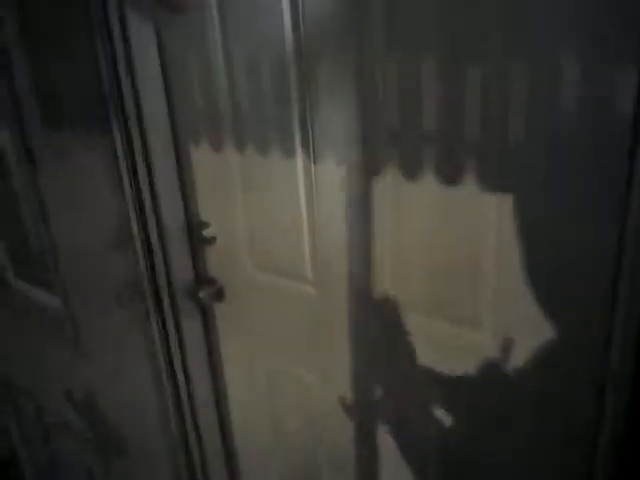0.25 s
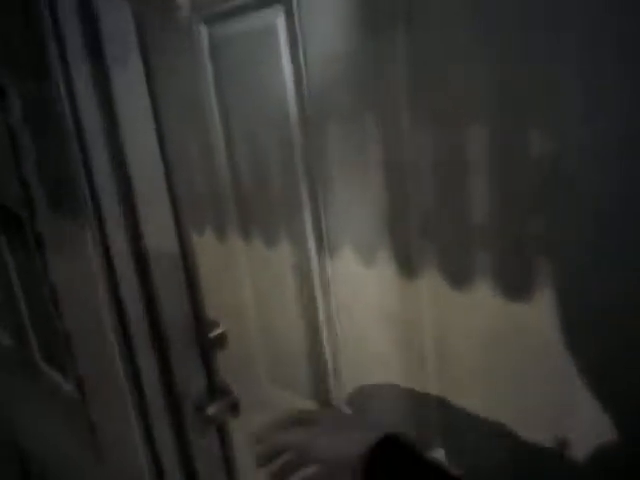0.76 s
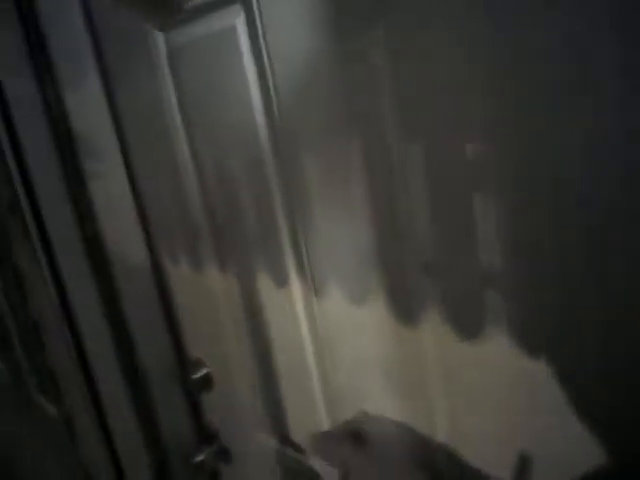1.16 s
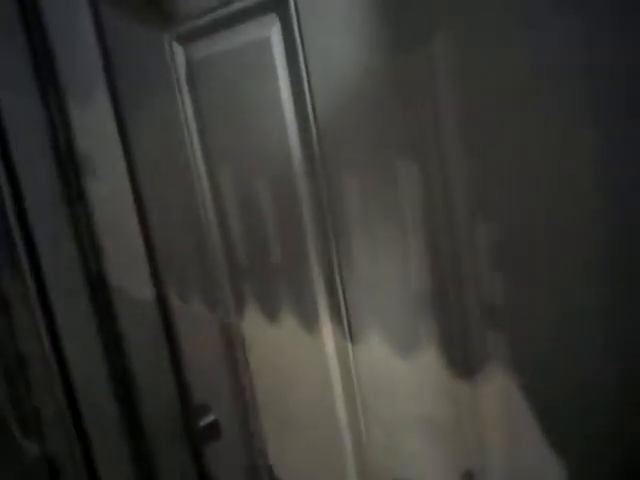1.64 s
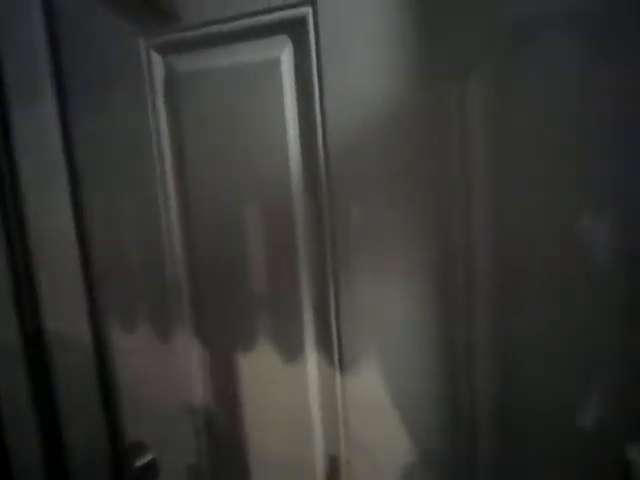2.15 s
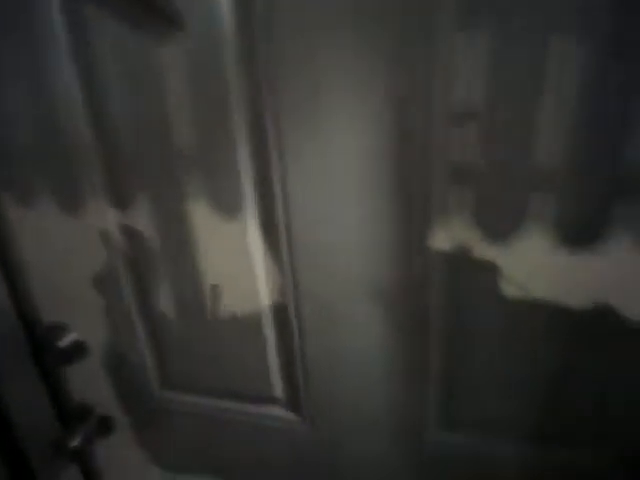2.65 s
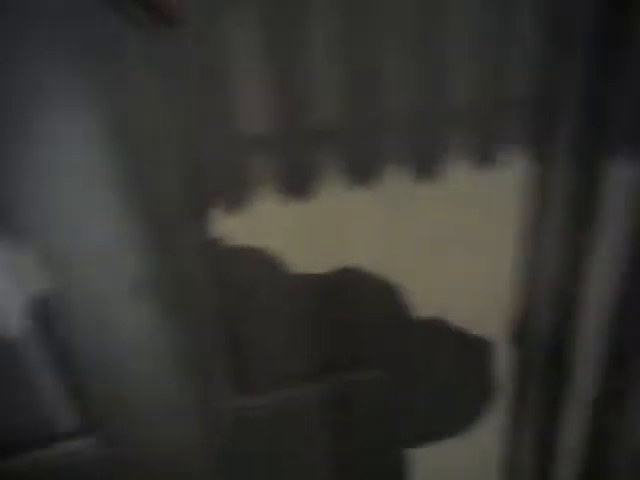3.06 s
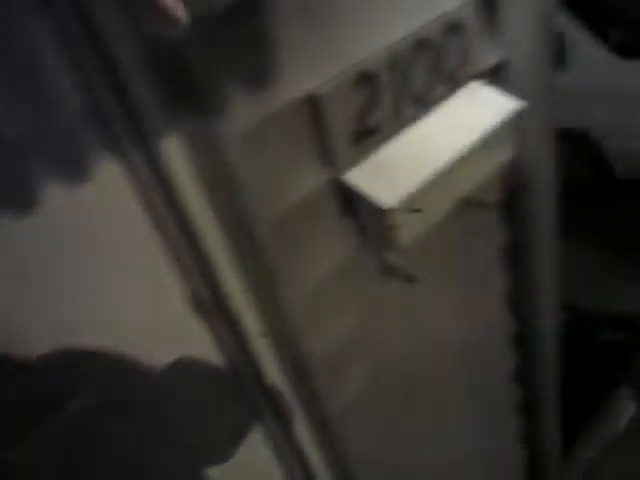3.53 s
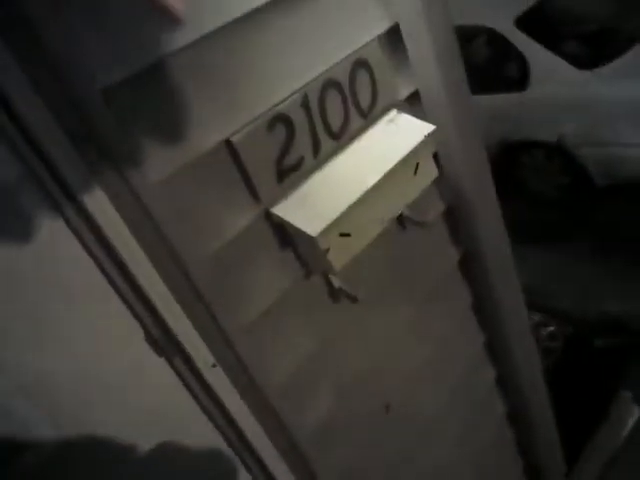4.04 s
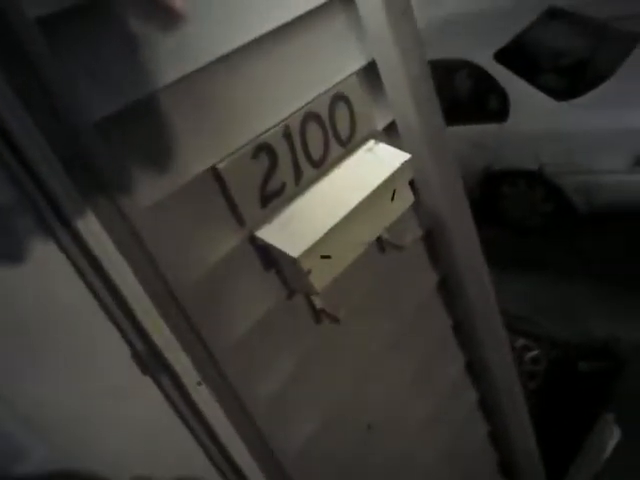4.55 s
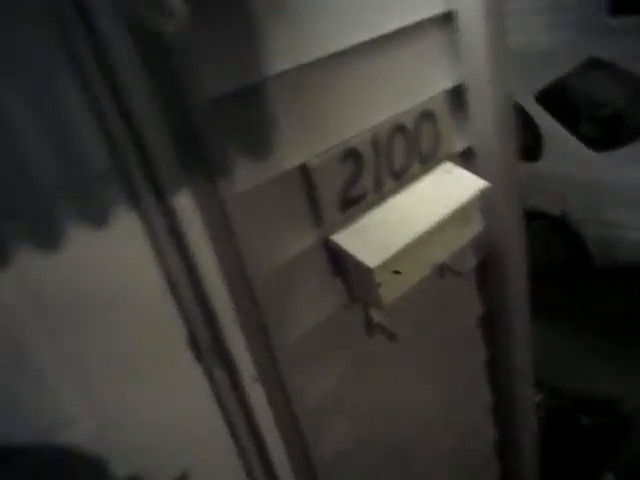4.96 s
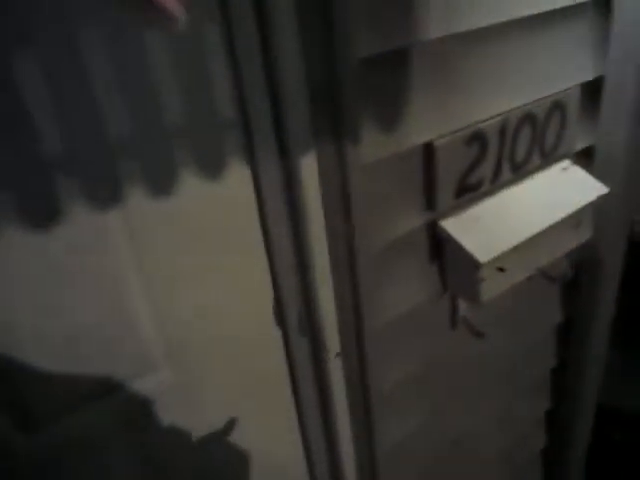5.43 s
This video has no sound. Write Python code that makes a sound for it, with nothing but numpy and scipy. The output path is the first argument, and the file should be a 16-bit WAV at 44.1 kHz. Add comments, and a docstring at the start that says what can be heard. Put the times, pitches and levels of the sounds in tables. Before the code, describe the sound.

A storm door scrapes and creaks open, then a fist knocks six times on the door behind it over soft night hiss.

```python
"""Soft night hiss and a faint tick on a small porch; then a storm door is pulled open, and its closer
scrapes and creaks as steady sliding friction parts into stick-slip. A fist knocks six times on the
panelled door behind it, exciting its modes; the last blow overloads the microphone. Hiss, rustling
clothes and a few ticks of the held door remain, all through a dull, narrow-band recorder."""
import sys
import numpy as np
from scipy import signal
from scipy.io import wavfile
from scipy.ndimage import uniform_filter1d

SR = 44100
rng = np.random.default_rng(int(sys.argv[2]) if len(sys.argv) > 2 else 0)


def bounce(signal):
    """Save signal as a 16-bit WAV file at the path given by the first command-line argument."""
    frames = np.transpose(np.atleast_2d(signal))
    limited = np.clip(frames, -1, 1)
    pcm = np.round(limited * 32767).astype(np.int16)
    wavfile.write(sys.argv[1], SR, pcm)


N = 250929
T = np.arange(SR) / SR  # time within one short sound, s
SCENE_T = np.arange(N) / SR

# modes of the storm door's frame: frequency_hz, level_db, t60_s
FRAME_MODES = [(1086, 5, 0.055), (1290, 8, .045), (1388, 3, 0.1), (1554, -15.5, 0.065), (1683, -14, 0.026),
               (1713, 4.5, 0.06), (2050, -4.5, 0.019)]
# spectrum of bright metal contact: frequency_hz, gain_db
PING_SPECTRUM = [(100, -29), (1400, 3.5), (2300, 9.5), (2700, 7), (3100, 2.5), (3700, -1.5), (4400, -25)]


def amp(db):
    """Decibels to amplitude ratio."""
    return 10 ** (np.asarray(db) / 20)


def unit_rms(x):
    """Normalises the power of a steady sound."""
    return x / np.sqrt(np.mean(x ** 2) + 1e-20)


def pulse(x):
    """Normalises a transient to the energy of 20 ms at rms 1."""
    return x / np.sqrt(np.sum(x ** 2) / (SR / 50))


def curve_at(points, hz):
    """Interpolates on a log-frequency axis."""
    frequencies, values = np.transpose(points)
    return np.interp(np.log(hz + 1), np.log(frequencies + 1), values)


def colour(x, spectrum):
    """Minimum-phase filter with the given magnitude spectrum."""
    log_gain = np.log(amp(curve_at(spectrum, abs(np.fft.fftfreq(4096, 1 / SR)))))
    taps = np.fft.ifft(np.exp(np.conj(signal.hilbert(log_gain)))).real
    return signal.oaconvolve(x, taps[:len(taps) // 2])[:len(x)]


def lowpass(x, hz):
    """Steep zero-phase low-pass."""
    return signal.oaconvolve(x, signal.firwin(401, hz, window=("kaiser", 9), fs=SR), "same")


def add(mix, start_s, sound):
    """Superposes a sound on the mix."""
    part = mix[max(round(start_s * SR), 0):][:len(sound)]
    part += sound[:len(part)]


def decay(t60_s):
    """Exponential damping: 60 dB down after t60_s."""
    return np.exp(-np.log(1000) * T / t60_s)


def mode(hz, t60_s):
    """Free vibration of one damped oscillator."""
    return decay(t60_s) * np.sin(2 * np.pi * hz * T)


def ring(modes):
    """Modal superposition; neighbours start in opposite phase."""
    return sum((-1) ** k * amp(db) * mode(hz, t60_s) for k, (hz, db, t60_s) in enumerate(modes))


def gate(start_s, end_s, attack_s, release_s):
    """Trapezoidal envelope."""
    return np.clip(np.minimum((SCENE_T - start_s) / attack_s, (end_s - SCENE_T) / release_s), 0, 1)


def air(level_db=-54.5, drift_db_per_s=-0.49, waver_db=1.53):
    """Outdoor hiss: broadband noise under slight random amplitude modulation."""
    # hiss spectrum: frequency_hz, gain_db
    spectrum = [(18, -39), (30, -16.5), (70, -0.5), (214, -2.5), (251, -3.5), (348, -3.5), (369, -3),
                (401, -4), (735, -5.5), (797, -5.5), (1200, -1.5), (1300, 1), (2020, -1), (2970, -7.5),
                (3790, -27), (4930, -46.5), (8340, -120)]
    waver = unit_rms(uniform_filter1d(rng.standard_normal(N), size=3000))
    envelope = amp(level_db + drift_db_per_s * SCENE_T + waver_db * waver)
    return envelope * unit_rms(colour(rng.standard_normal(N), spectrum))


def click(t60_s, crack_db):
    """Impulse response: a direct crack and a short scatter of reflections."""
    scatter = rng.standard_normal(SR) * decay(t60_s)
    return pulse(scatter) + amp(crack_db) * pulse(signal.unit_impulse(SR))


def ticks():
    """Light impacts in the held door: dry clicks, each with one quickly damped metal mode."""
    # ticks, levels relative: start_s, body_db, treble_db, ring_hz, ring_db
    impacts = [(0.004, -40, -70, 1560, -54.5), (3.675, -44, -64.5, 2070, -55),
               (3.985, -39.5, -68, 1740, -57), (4.137, -38, -80, 1640, -57.5),
               (4.392, -36.5, -46, 3100, -47.5), (4.653, -32.5, -42, 2200, -47),
               (4.916, -55, -61.5, 1628, -61), (5.615, -43, -63.5, 1640, -55.5)]
    # spectrum of a tick's body: frequency_hz, gain_db
    tap_spectrum = [(100, -23), (600, -9), (1000, 5), (1300, 7), (1750, 18), (2200, 7), (4400, -58.5)]
    out = np.zeros(N)
    for start_s, body_db, treble_db, ring_hz, ring_db in impacts:
        tick = click(t60_s=0.075, crack_db=-8)
        add(out, start_s, amp(body_db - 10) * pulse(colour(tick, tap_spectrum)))
        add(out, start_s, amp(treble_db - 1) * pulse(colour(tick, PING_SPECTRUM)))
        add(out, start_s, amp(ring_db) * pulse(mode(ring_hz, t60_s=0.018)))
    return out


def scrape(start_s=0.16, growth_db_per_s=13, slips_per_s=220, grain_share=0.38):
    """Sliding friction: tiny slips merge into a growing hiss that drives resonances of frame and rod."""
    # friction spectrum: frequency_hz, gain_db
    rub_spectrum = [(350, -40.5), (600, -11.5), (716, -41), (953, -5), (1530, -6), (1670, 6), (1840, -2.5),
                    (2700, -10.5), (3170, -13.5), (3510, -36), (3790, -41), (4930, -78.5), (8340, -120)]
    envelope = amp(-50.5 + growth_db_per_s * (SCENE_T - start_s))
    envelope *= gate(start_s, end_s=0.83, attack_s=0.044, release_s=0.12)
    catches = (rng.random(N) < slips_per_s / SR) * rng.uniform(0.5, 1, N)
    grains = unit_rms(signal.oaconvolve(catches, decay(0.019))[:N] * rng.standard_normal(N))
    friction = envelope * unit_rms(grain_share * grains + (1 - grain_share) * rng.standard_normal(N))
    hiss = unit_rms(colour(friction, rub_spectrum))
    frame = unit_rms(signal.oaconvolve(friction, ring(FRAME_MODES))[:N])
    squeal = unit_rms(signal.oaconvolve(friction, mode(hz=1690, t60_s=0.09))[:N])
    return np.std(friction) * (amp(-2) * hiss + amp(-9) * frame + amp(-8) * squeal)


def rod(ease_s=0.076):
    """The rod slides out of the closer: narrow-band noise gives a thin, pitched hiss."""
    # strokes of the rod: start_s, end_s, level_db
    strokes = [(0.247, 0.626, -53), (0.62, 1.495, -66.5), (1.724, 2.07, -50)]
    # sliding spectrum: frequency_hz, gain_db
    spectrum = [(100, -50.5), (1500, -23), (1850, -1), (2030, 1.5), (2250, -16), (3200, -16), (3700, -38),
                (4400, -44)]
    envelope = sum(amp(db) * gate(start_s, end_s, ease_s, ease_s) for start_s, end_s, db in strokes)
    return envelope * unit_rms(colour(rng.standard_normal(N), spectrum))


def thump(start_hz=180, end_hz=93, settle_s=0.0049, push_s=0.025):
    """Forced, then free vibration: a shoved door leaf falls in pitch as it yields, then sways."""
    # modes of the whole leaf in its frame: frequency_hz, level_db, t60_s
    leaf_modes = [(66, -25.5, 0.25), (84, -22.5, 0.3), (98.4, -19, 0.43), (119.3, -17.5, 0.5),
                  (132, -26, 0.41)]
    push = np.sin(np.pi * np.minimum(T / push_s, 1) ** 0.72)
    settled = 1 - np.exp(-T / settle_s)
    cycles = end_hz * T + (start_hz - end_hz) * settle_s * settled
    sway = sum(amp(db) * mode(hz, t60_s) for hz, db, t60_s in leaf_modes)
    return pulse(push * np.sin(2 * np.pi * cycles) - amp(1) * sway * settled)


def nudge(start_s=0.394, level_db=-54):
    """A soft, low bump sounds early in the scrape."""
    out = np.zeros(N)
    add(out, start_s, amp(level_db) * thump())
    return out


def rasp(peak_s=0.484):
    """A bright burst of friction noise in mid-scrape: a sharp peak on a wider skirt."""
    away_s = abs(SCENE_T - peak_s)
    envelope = amp(-45) * np.exp(-away_s / 0.009) + amp(-54) * np.exp(-away_s / 0.074)
    return envelope * unit_rms(colour(rng.standard_normal(N), PING_SPECTRUM))


def slips(pull_peak_s=1.17, pull_fall_db_per_s2=23, scatter_db=2.5):
    """Stick-slip in the closer: each run has its own rate, and its strength follows the pull."""
    # runs, levels relative: first_s, last_s, slip_count, body_db, treble_db, jitter_share
    runs = [(0.557, 0.737, 8, -43, -52, 0.13), (0.779, 0.974, 7, -33.5, -47.5, 0.009),
            (1.007, 1.055, 3, -31, -49, .02), (1.076, 1.114, 3, -36, -62.5, 0.018),
            (1.350, 1.558, 7, -27.5, -45.5, .01)]
    # single jerks when the door barely moves, levels relative: start_s, body_db, treble_db
    jerks = [(1.1602, -27.5, -46), (1.1963, -29, -47.5), (1.2182, -32, -51.5), (1.2408, -31.5, -50),
             (1.531, -40, -40), (1.6138, -28, -39.5), (1.6852, -26, -41), (1.783, -32.5, -63),
             (1.834, -34.5, -48.5), (2.018, -43, -46)]
    rows = []
    for first_s, last_s, count, body_db, treble_db, jitter_share in runs:
        times, gap_s = np.linspace(first_s, last_s, count, retstep=True)
        lateness, scatter = rng.standard_normal((count, 2)).T
        pull_db = -pull_fall_db_per_s2 * (times - pull_peak_s) ** 2
        force_db = pull_db - pull_db.mean() + scatter_db * scatter
        rows += zip(times + jitter_share * gap_s * lateness, body_db + force_db, treble_db + force_db)
    return rows + jerks


def creak(variation=0.16, ring_gain=0.33):
    """Impulse excitation: every slip rings the frame's modes nearly alike; the bright snap varies."""
    # spectrum of a slip's body: frequency_hz, gain_db
    clack_spectrum = [(100, -41), (650, -22), (1000, -0.5), (1650, 12), (2100, 0.5), (2600, -21.5),
                      (3600, -32), (4400, -49)]
    # spectrum of its snap: frequency_hz, gain_db
    snap_spectrum = [(100, -51.5), (1500, 6.5), (2300, 6), (2750, -0.5), (3250, 7), (3500, -25.5),
                     (3800, -15.5), (4400, -48)]
    out = np.zeros(N)
    common = click(t60_s=0.089, crack_db=-2)
    frame = sum(amp(db) * mode(hz, t60_s) for hz, db, t60_s in FRAME_MODES)
    metal = pulse(colour(frame, clack_spectrum))
    for start_s, body_db, treble_db in slips():
        fresh = click(t60_s=0.073, crack_db=-7)
        clack = pulse(colour(common + variation * fresh, clack_spectrum))
        body = pulse(clack + ring_gain * metal)
        snap = pulse(colour(fresh, snap_spectrum))
        add(out, start_s, amp(body_db - 8) * body + amp(treble_db) * snap)
    return out


def rustle(grain_db=2.5):
    """Cloth friction: grainy noise swells and fades as the visitor moves."""
    # movements: peak_s, half_width_s, level_db
    swells = [(1.2, 0.68, -54), (2.422, 0.2, -56.5), (3.3, 0.36, -55.5), (3.7, 0.13, -62.5),
              (4.33, 0.17, -56)]
    # cloth spectrum: frequency_hz, gain_db
    spectrum = [(60, -15.5), (300, -9), (800, -7), (1300, 0.5), (2100, 1.5), (3200, -5.5), (3600, -20.5),
                (4400, -36)]
    grain = unit_rms(uniform_filter1d(rng.standard_normal(N), size=300))
    envelope = sum(amp(db) * np.exp(-((SCENE_T - s) / width_s) ** 2) for s, width_s, db in swells)
    return envelope * unit_rms(colour(amp(grain_db * grain) * rng.standard_normal(N), spectrum))


def rap(hz=1535, swell_s=0.0016, echo_gain=0.64, skin_rise_s=0.017):
    """Knuckle impact: a hard note, reflected by the open storm door, while the door's skin rings on."""
    # high modes of the skin: frequency_hz, level_db, t60_s
    skin_modes = [(1504, 2.5, 0.029), (1434, 1.5, 0.1), (1670, -18, 0.13), (1708, 7.5, 0.057),
                  (2390, -30, 0.14), (3000, -23, 0.15)]
    note = T / swell_s * np.exp(-T / swell_s) * np.sin(2 * np.pi * hz * T)
    echoed = note.copy()
    add(echoed, 6 / hz, echo_gain * note)  # six periods late, so in phase
    skin = ring(skin_modes) * (1 - np.exp(-(T / skin_rise_s) ** 2))
    return pulse(pulse(echoed) + amp(-8) * pulse(skin))


def panel(tilt_db_per_octave, strong_hz, weak_hz, contrast_db, mute_share=0.76, width_octaves=0.31):
    """Mode shapes: the struck spot lies on an antinode of some modes and on a node of others."""
    # modes of the panelled door: frequency_hz, level_db, t60_s
    door_modes = [(251.5, -6, 0.21), (308, -5.5, 0.05), (411.3, -1.5, 0.15), (504.5, 0.5, 0.2),
                  (567, -2.5, 0.14), (637.7, -0.5, 0.13), (725, -2, 0.16), (799, 4, 0.14),
                  (837.5, -4.5, .14), (871, -6, 0.17), (1076, -6, 0.11), (1090, -2.5, 0.1),
                  (1222, 1, 0.097), (1305, -6.5, 0.16)]
    hz, db, t60_s = np.transpose(door_modes)
    strong, weak = (np.exp(-(np.log2(hz / f) / width_octaves) ** 2) for f in (strong_hz, weak_hz))
    tilt_db = tilt_db_per_octave * np.log2(hz / hz[0])
    spot_db = contrast_db * (strong - mute_share * weak)
    return ring(zip(hz, db + tilt_db + spot_db, t60_s))


def reflections():
    """Reverberation between door, siding and roof; the treble is absorbed first."""
    # reverberation time of the porch: frequency_hz, t60_s
    porch_t60 = [(150, .3), (600, 0.19), (1500, 0.17), (3500, 0.1)]
    hz, t, spectra = signal.stft(rng.standard_normal(SR), SR, nperseg=256)
    damping = np.exp(-np.log(1000) * t / curve_at(porch_t60, hz)[:, None])
    return signal.istft(spectra * damping, SR, nperseg=256)[1][:SR]


def hand_padding(x, cutoff_hz=3000):
    """A compliant contact is a low-pass: flesh rounds the edge of every blow."""
    return signal.sosfiltfilt(signal.butter(3, cutoff_hz, fs=SR, output="sos"), x)


def knocks(panel_rise_s=0.0042, rattle_rise_s=0.005):
    """Each impact excites leaf, panel and skin and rattles the frame; the hardest jingle the latch."""
    # blows, levels relative: start_s, thump_db, panel_db, rap_db, rattle_db,
    # then the struck spot: tilt_db_per_octave, strong_hz, weak_hz, contrast_db
    blows = [(1.2440, -28, -32.5, -38.5, -34.5, -12, 725, 410, 9),
             (1.4500, -28.5, -22, -21.5, -32.5, 2, 597, 330, 10),
             (1.7180, -25.5, -21, -13.5, -29, -0.5, 593, 670, 1),
             (1.884, -26.5, -25.5, -16, -32.5, -5.5, 400, 720, 0.5),
             (2.1867, -36, -24, -21.5, -36.5, 1.5, 252, 660, 8),
             (2.4852, -27.5, -15.5, -9, -28, 6.5, 400, 540, 9)]
    door, loose_parts = np.zeros(N), np.zeros(N)
    shove, knuckles = thump(), rap()
    shaken = 1 - np.exp(-T / rattle_rise_s)
    top_rattle_db = max(row[4] for row in blows)
    for start_s, thump_db, panel_db, rap_db, rattle_db, *spot in blows:
        wood = pulse(panel(*spot) * (1 - np.exp(-T / panel_rise_s)))
        add(door, start_s, amp(thump_db) * shove + amp(panel_db) * wood + amp(rap_db - 1) * knuckles)
        jingle_db = -8 + 0.91 * (rattle_db - top_rattle_db)
        add(loose_parts, start_s, amp(rattle_db) * rattle(shaken, jingle_db))
    return hand_padding(door) + loose_parts


def rattle(onset, jingle_db):
    """Loose contacts chatter: door and frame clatter while the latch jingles."""
    # clatter spectrum: frequency_hz, gain_db
    spectrum = [(60, -17.5), (200, 1), (700, 4.5), (950, 3), (1300, 1.5), (1700, 7.5), (2000, -1.5),
                (2400, -4), (3100, -12.5), (3700, -29), (4400, -41)]
    clatter = pulse(colour(reflections() * onset, spectrum))
    jingle = pulse(colour(rng.standard_normal(SR) * decay(0.13) * onset, PING_SPECTRUM))
    return amp(8) * clatter + amp(jingle_db) * jingle


def scene():
    """Superposition of all sources at one microphone."""
    return (knocks() + creak() + scrape() + rasp() + rod() + nudge() + ticks() + rustle() + air())[None]


def record(dry, headroom=1.25, ceiling=0.69, low_hz=45, high_hz=4350):
    """Saturation rounds loud peaks, the band is narrowed, and the highest crests clip."""
    rounded = headroom * np.tanh(dry[0] / headroom)
    thinned = signal.sosfilt(signal.butter(3, low_hz, "highpass", fs=SR, output="sos"), rounded)
    clipped = np.clip(lowpass(thinned, high_hz), -ceiling, ceiling)
    return lowpass(clipped, hz=15500)[None]


dry = scene()
out = record(dry)
bounce(out)
```